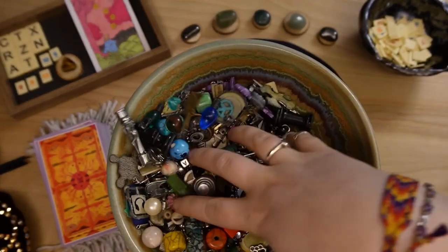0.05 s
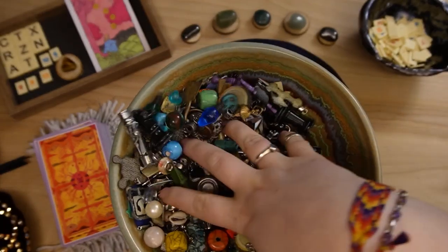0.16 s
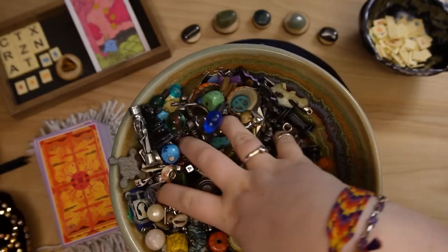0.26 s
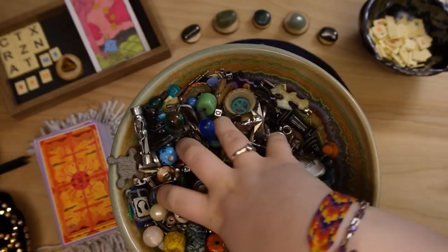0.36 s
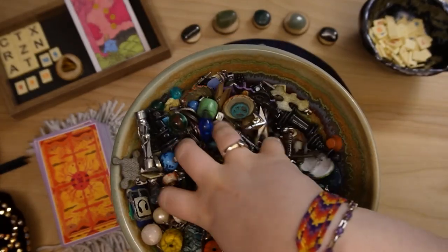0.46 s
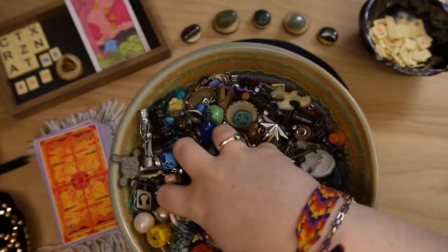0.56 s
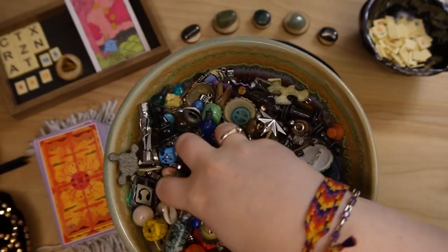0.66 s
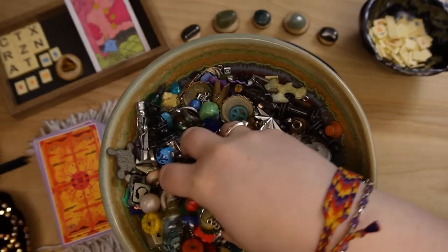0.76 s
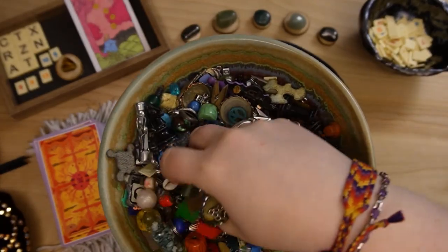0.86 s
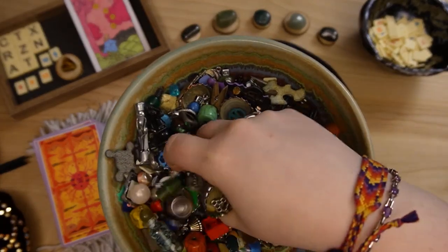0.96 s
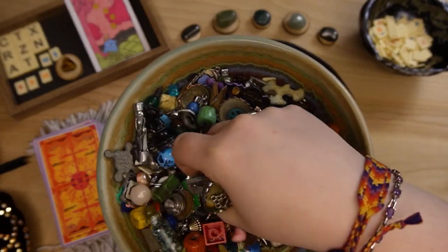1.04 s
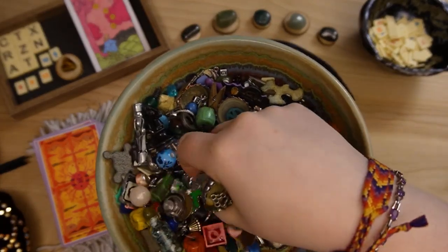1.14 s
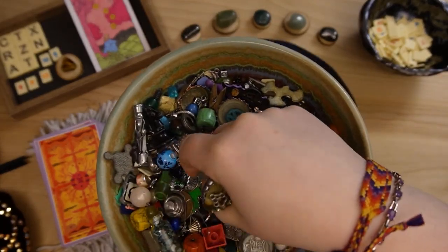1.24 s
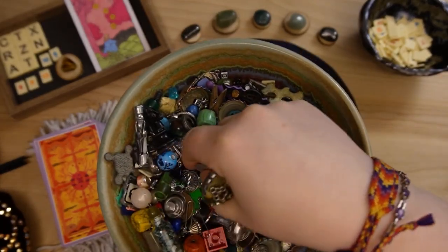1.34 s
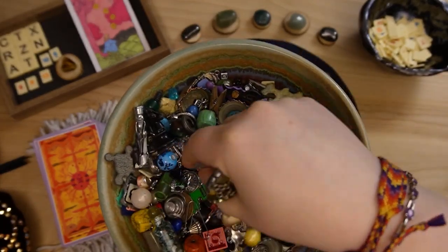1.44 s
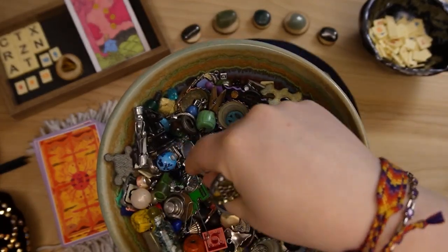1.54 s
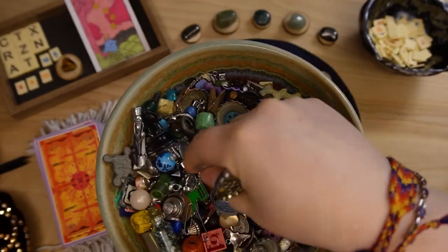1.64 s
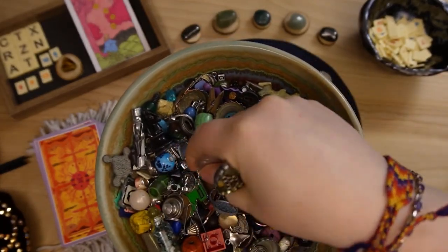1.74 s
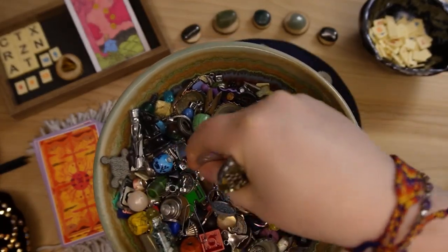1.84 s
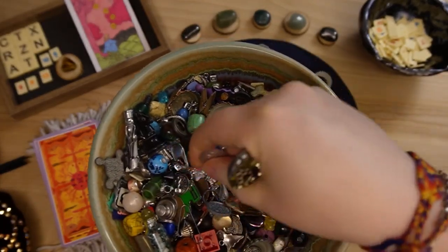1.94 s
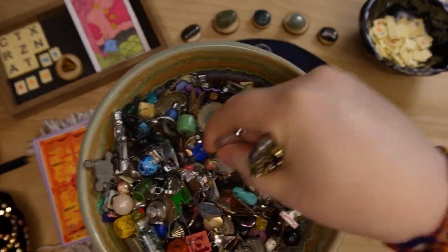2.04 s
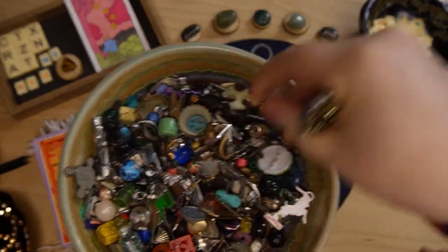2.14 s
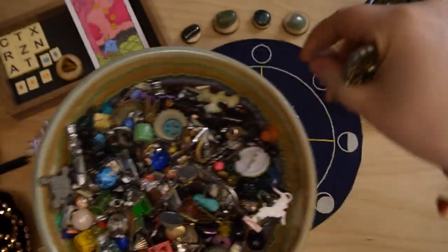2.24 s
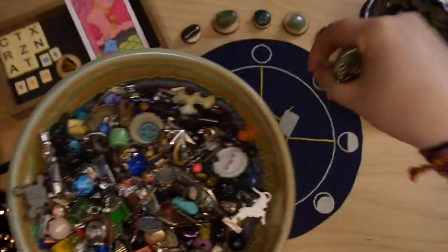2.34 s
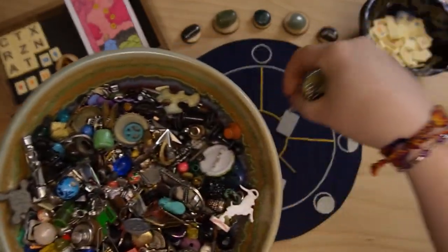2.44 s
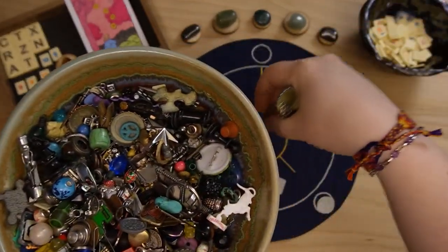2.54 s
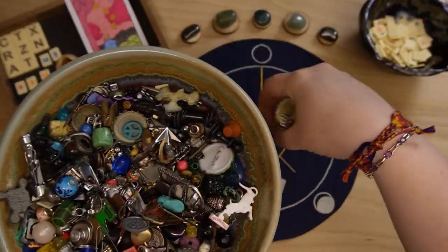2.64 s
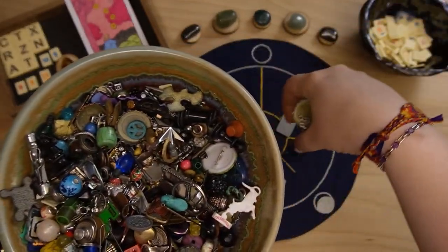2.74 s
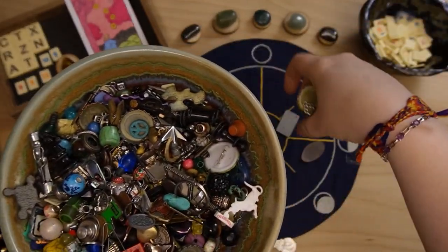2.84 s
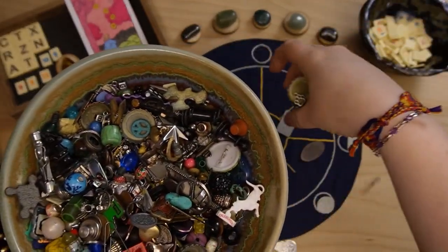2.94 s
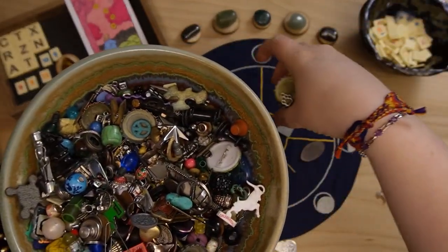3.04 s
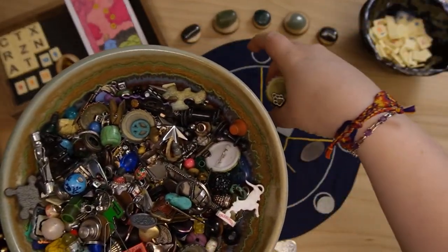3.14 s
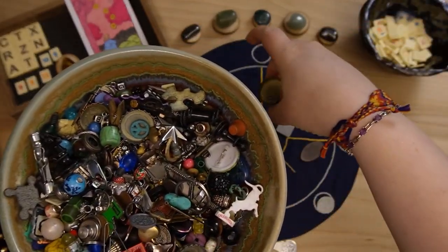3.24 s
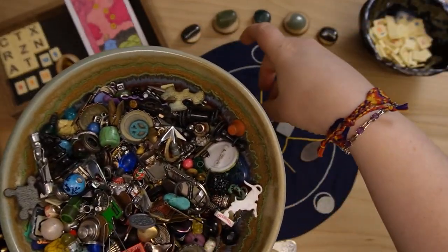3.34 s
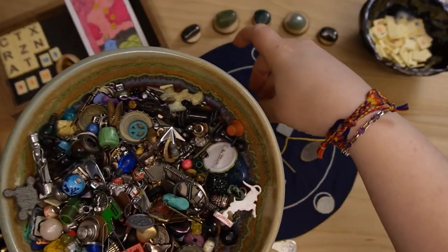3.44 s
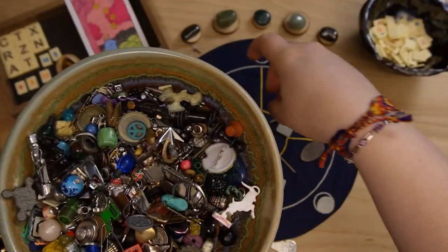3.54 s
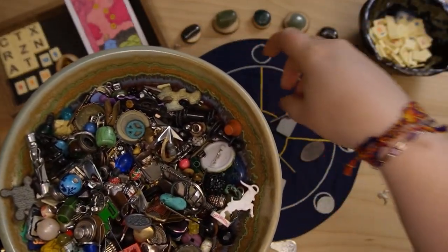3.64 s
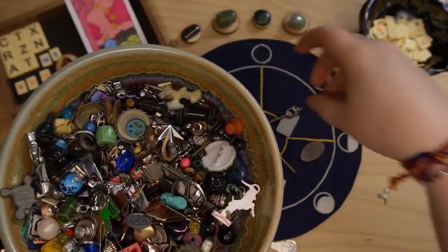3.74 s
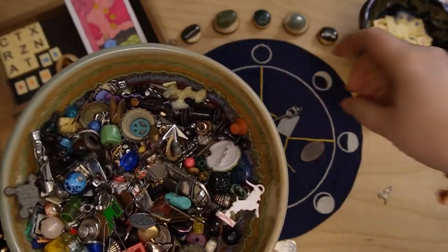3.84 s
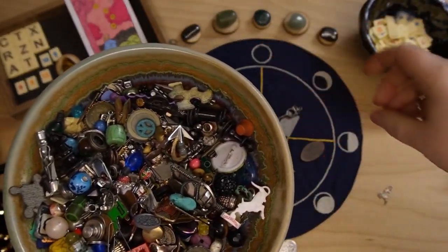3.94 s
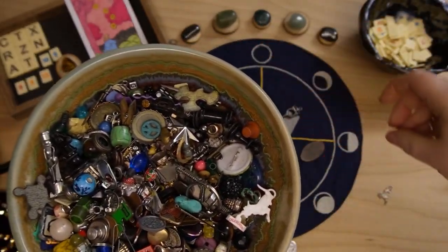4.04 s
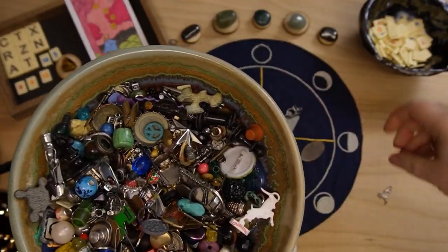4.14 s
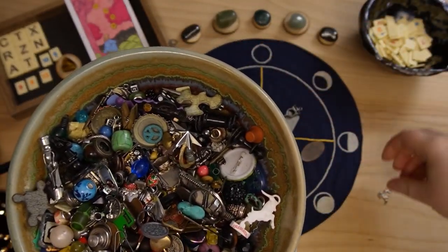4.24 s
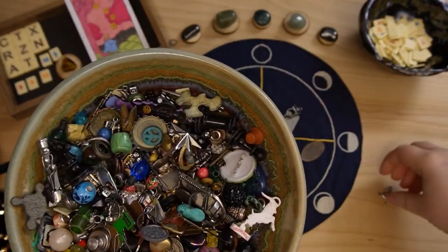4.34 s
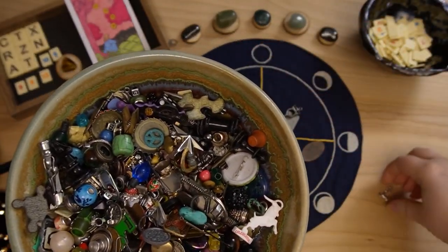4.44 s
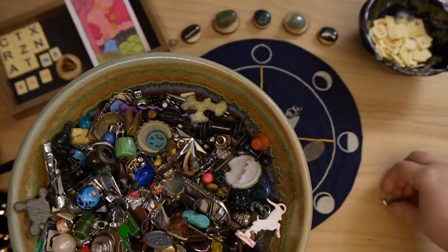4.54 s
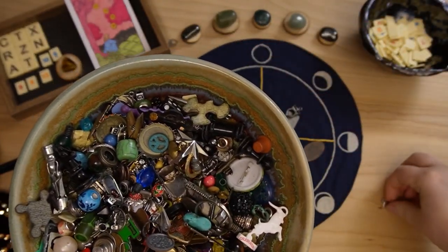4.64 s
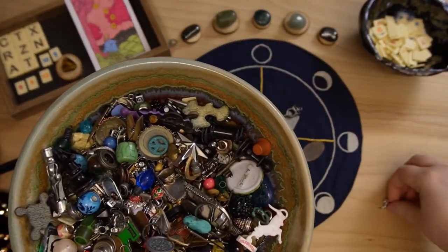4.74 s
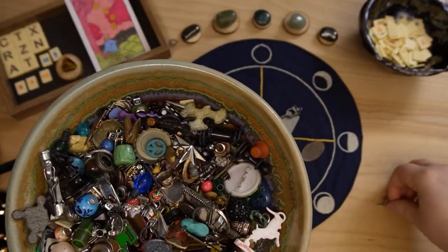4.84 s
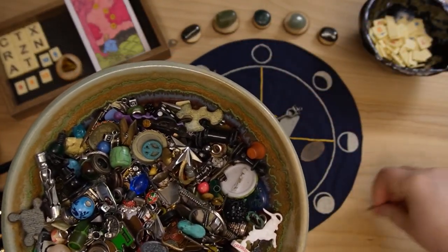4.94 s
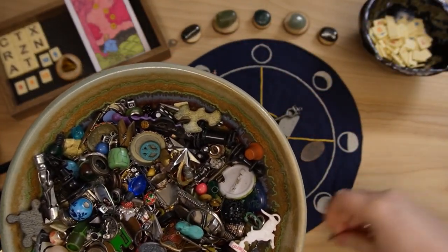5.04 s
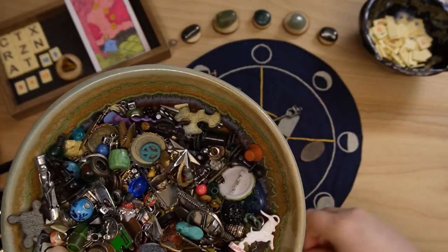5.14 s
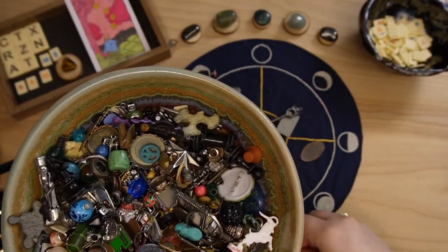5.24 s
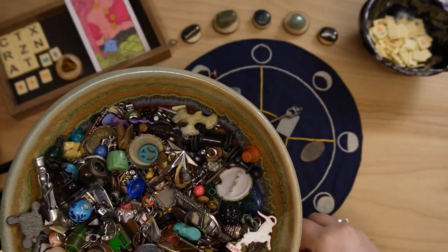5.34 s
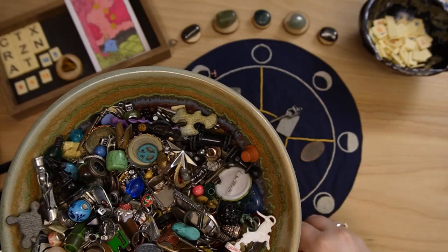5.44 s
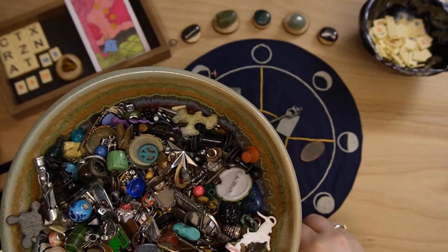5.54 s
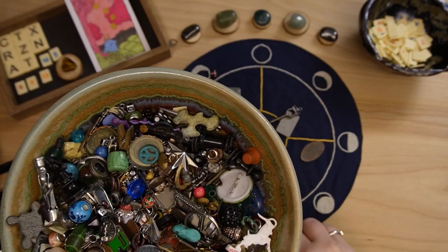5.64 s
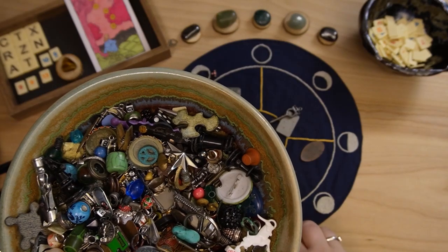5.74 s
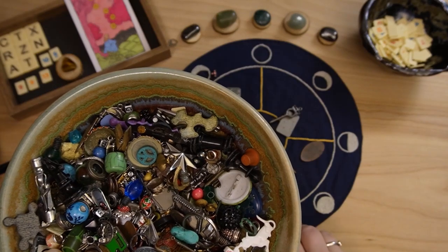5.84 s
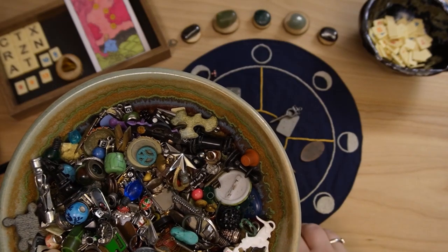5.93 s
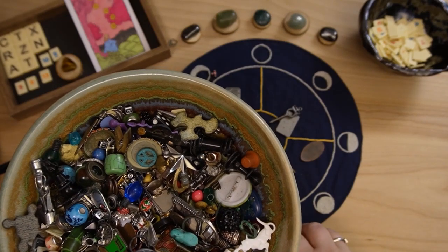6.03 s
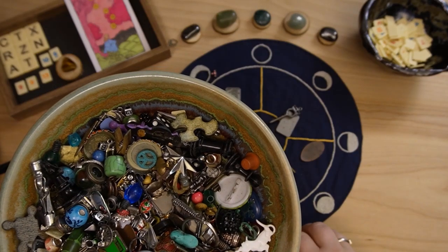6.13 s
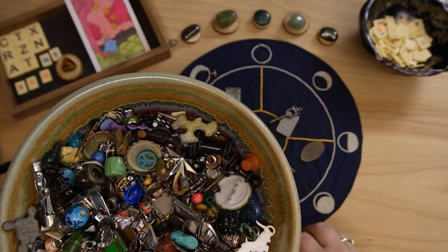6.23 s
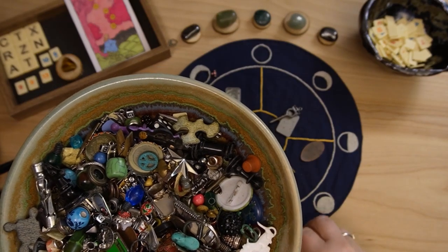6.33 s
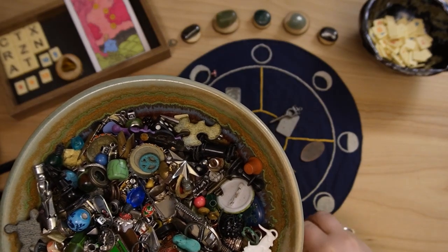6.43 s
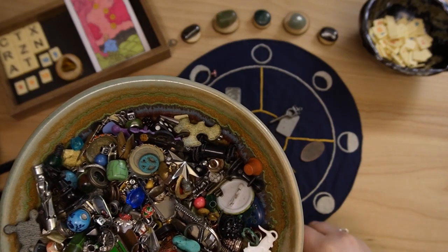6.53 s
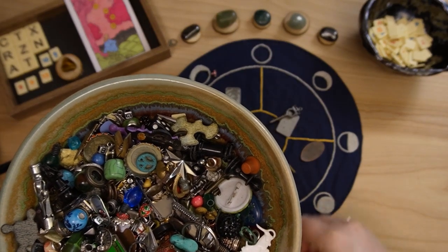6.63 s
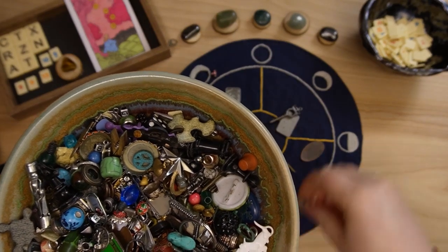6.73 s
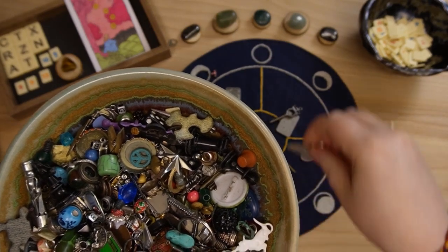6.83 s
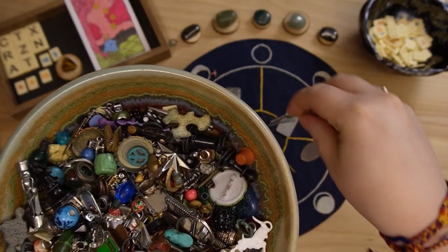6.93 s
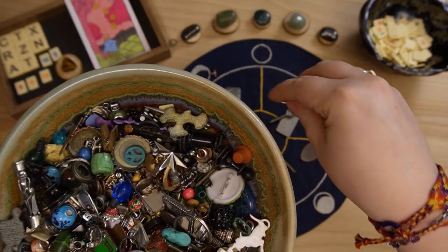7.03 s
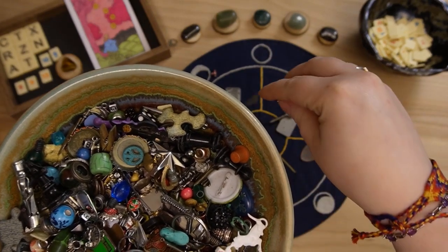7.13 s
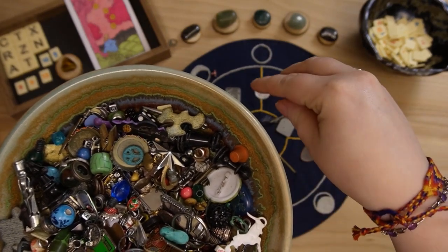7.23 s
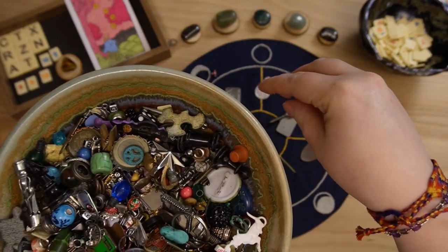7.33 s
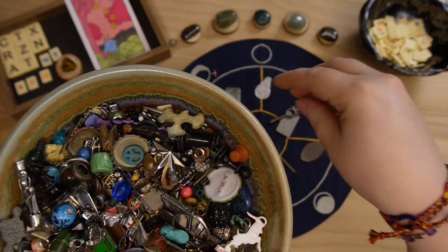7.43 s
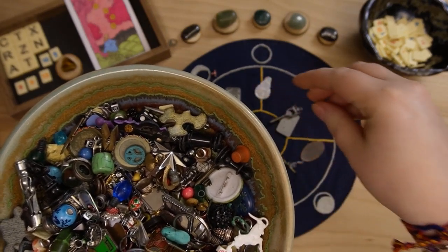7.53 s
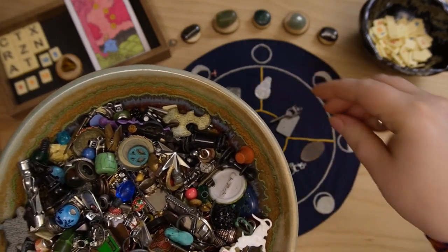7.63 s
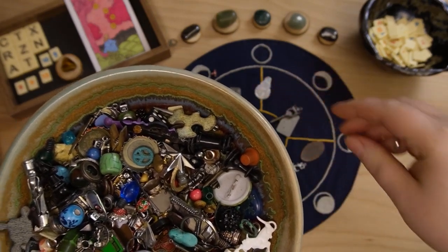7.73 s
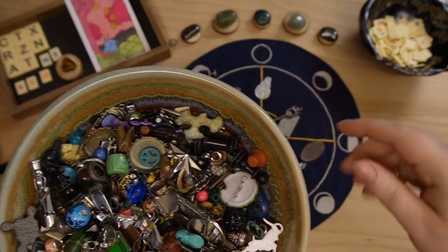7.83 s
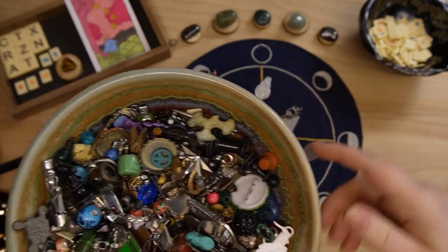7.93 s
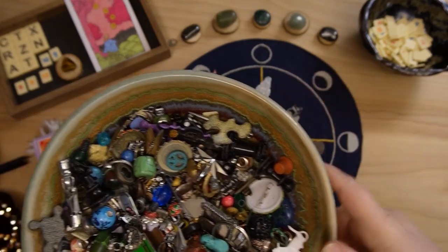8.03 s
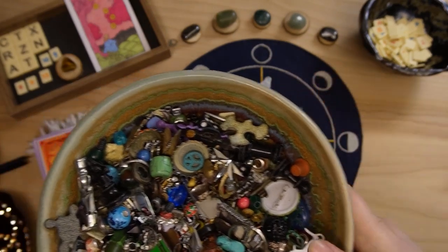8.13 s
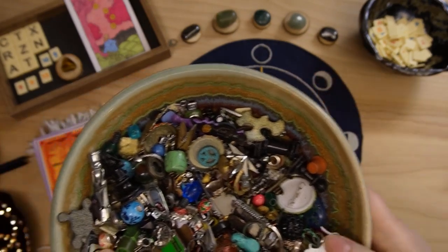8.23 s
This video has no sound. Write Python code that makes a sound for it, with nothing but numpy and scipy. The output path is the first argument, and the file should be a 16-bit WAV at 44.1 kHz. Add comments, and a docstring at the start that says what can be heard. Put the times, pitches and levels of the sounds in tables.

```python
"""A hand rummages in a ceramic bowl of small metal charms and beads: random tiny impacts on many modes.
It lifts a few out: they clink in the fingers as decaying sines and knock on a cloth on a wooden table.
The hand bumps the table, charms grind and rattle over the wood, and one hops on the bare wood to rest.
The hand drags a charm, bumps and rubs along the table with shaped noise and tiny slips of skin, and its
nails tick; then the last charms drop and a faint hiss comes up. All is close, in a small dry room."""
import sys
import numpy as np
from scipy import signal
from scipy.fft import rfft, irfft, next_fast_len
from scipy.io import wavfile
from scipy.ndimage import uniform_filter1d

SR = 44100
rng = np.random.default_rng(int(sys.argv[2]) if len(sys.argv) > 2 else 0)


def unload_audio(sound):
    """Save the sound as a 16-bit wav file, at the path given as the first command line argument."""
    columns = np.transpose(np.atleast_2d(sound))
    # keep every value between -1 and 1, then stretch to whole-number steps
    steps = np.round(np.clip(columns, -1, 1) * 32767)
    wavfile.write(sys.argv[1], SR, steps.astype(np.int16))


N = 365126
TIME = np.arange(N) / SR
AGE = TIME[:SR // 3]   # seconds since a blow


def from_db(db):
    """Turn decibels into gain."""
    return 10 ** (np.asarray(db) / 20)


def rms_one(x):
    """Scale a sound to rms 1."""
    return x / np.sqrt(np.mean(x ** 2) + 1e-20)


def attack_one(x):
    """Scale a blow so that its first 4 ms have the power of a sine of height 1."""
    return x / np.sqrt(2 * np.mean(x[:SR // 250] ** 2) + 1e-20)


def gain_curve(rows, axis=1):
    """Join the levels of a dB column into a gain over time, practically silent outside its rows."""
    rows = np.array(rows)
    return from_db(np.interp(TIME, rows[:, 0], rows[:, axis], left=-140, right=-140))


SWELL_SHAPE = 0.9   # power to which the half sine of a stroke is raised


def swells(rows, axis=2):
    """Gain over time of strokes that each swell and fade; rows begin with start and length in seconds."""
    gain = np.zeros(N)
    for row in rows:
        arch = np.sin(np.linspace(0, np.pi, max(round(row[1] * SR), 2)))
        add(gain, row[0], from_db(row[axis]) * np.abs(arch) ** SWELL_SHAPE)
    return gain


def gain_at(spectrum, hz):
    """Read the gain of a spectrum at the given frequencies."""
    points = np.array(spectrum)
    return from_db(np.interp(np.log(hz + 1), np.log(points[:, 0]), points[:, 1]))


def cut(x, hz, kind="low", order=2):
    """Keep only the lows or the highs with a Butterworth filter."""
    sos = signal.butter(order, min(hz, SR / 2 - 1000), kind, fs=SR, output="sos")
    return signal.sosfilt(sos, x + 1e-18)


def add(track, s, sound):
    """Mix a sound into the track at s seconds."""
    start = max(round(s * SR), 0)
    track[start:start + len(sound)] += sound[:N - start]


def noise(spectrum):
    """Steady noise of a given colour, rms 1: white noise shaped by the spectrum."""
    size = next_fast_len(N)
    shape = gain_at(spectrum, np.fft.rfftfreq(size, 1 / SR))
    coloured = irfft(rfft(rng.standard_normal(size)) * shape, size)
    return rms_one(coloured[:N])


def dying_sines(hz, t60):
    """One decaying sine of height 1 per mode; t60 is the time in seconds to fall by 60 dB."""
    age = AGE.astype(np.float32)
    loss = np.minimum(np.outer(np.float32(np.log(1000) / t60), age), 30)
    return np.exp(-loss) * np.sin(np.outer(np.float32(2 * np.pi * hz), age))


def ring(modes, vary_db, waver=1):
    """One blow on a few clear modes, each with a random strength and sign of its own."""
    hz, db, t60 = np.array(modes).T
    strength = from_db(db + vary_db * rng.standard_normal(db.shape)) * rng.choice([-1, 1], db.shape)
    return attack_one(strength @ (waver * dying_sines(hz, t60)))


def dense_body(spectrum, t60, slope, count):
    """Crowded modes whose energy follows the spectrum; t60 holds at 1 kHz and higher modes die sooner."""
    grid = np.linspace(np.sqrt(spectrum[0][0]), np.sqrt(spectrum[-1][0]), count) ** 2
    spacing = np.gradient(grid)
    hz = grid + spacing * rng.uniform(-.5, 0.64, count)
    life = t60 * (hz / 1000) ** -slope
    height = gain_at(spectrum, hz) * np.sqrt(spacing / life)
    return np.float32(height)[:, None] * dying_sines(hz, life)


def strikes(body, count):
    """Hit a body at several points: each pushes its modes with a different pattern of signs."""
    signs = rng.choice(np.float32([-1, 1]), (count, len(body)))
    return (signs @ body).astype(float)


def blows(rows, body, alike=0):
    """A row of blows on one body; alike is the share of power from a sound that they have in common."""
    track, alike = np.zeros(N), np.clip(alike, 0, 1)
    common, *own = strikes(body, count=len(rows) + 1)
    for (s, db), sound in zip(rows, own):
        mixed = np.sqrt(alike) * common + np.sqrt(1 - alike) * sound
        add(track, s, from_db(db) * attack_one(mixed))
    return track


EDGE_GAP_S, EDGE_LOSS_DB = 0.0018, 4   # typical time between two edges; loss from each edge to the next


def landing(body, count=3):
    """An uneven charm lands on one edge, then tips onto the next ones within a few milliseconds."""
    delays = np.arange(count) * EDGE_GAP_S * rng.uniform(.7, 1.3)
    total = np.zeros(len(AGE))
    for k, edge in enumerate(strikes(body, count)):
        late = np.pad(edge, (round(delays[k] * SR), 0))[:len(AGE)]
        total += from_db(-EDGE_LOSS_DB * k) * late
    return attack_one(total)


def collisions(per_s, spread_db, clump_db=3.0, clump_s=.012):
    """Random tiny impacts, many weak and few strong, bunched into little avalanches."""
    knots = np.arange(0, N / SR, max(clump_s, 1 / 500))
    wander = np.clip(rng.standard_normal(len(knots)), -2, 2)
    surge = from_db(clump_db * np.interp(TIME, knots, wander))
    sizes = from_db(spread_db * np.minimum(rng.exponential(1, N), 3.5)) * rng.choice([-1, 1], N)
    happens = rng.random(N) < surge * per_s / SR
    return sizes * np.sqrt(surge) * happens


def clatter(clicks, voices, turnover=30, count=4):
    """A few voices play at a time and new ones take over (turnover per s); the power is kept near 1."""
    track, times = np.zeros(N), np.flatnonzero(clicks) / SR
    chosen = (times * turnover).astype(int) + rng.integers(0, count, len(times))
    for s, size, k in zip(times, clicks[clicks != 0], chosen):
        add(track, s, size * voices[k % len(voices)])
    power = np.abs(uniform_filter1d(track ** 2, SR // 16))
    return track / np.sqrt(power + 1e-12)


def faint_partials(t60=0.082, count=16, top_hz=12500):
    """An irregular casting has many weak partials besides its main modes."""
    hz = rng.uniform(2200, top_hz, count)
    return np.column_stack([hz, np.zeros(count), t60 * rng.uniform(0.73, 1.2, count)])


def room(x, t60=0.086, wall_hz=6000, first_s=0.002):
    """Dense, quickly dying reflections of a furnished room, made from fading dulled noise."""
    fade = from_db(-60 * AGE / t60) * np.clip(AGE / first_s - 1, 0, 1)
    echoes = cut(rng.standard_normal(len(AGE)), wall_hz, order=1) * fade
    return signal.fftconvolve(x, echoes / np.sqrt(np.sum(echoes ** 2)))[:N]


# The colour of the quiet room. Each row: frequency in Hz, relative level in dB per Hz.
ROOM_COLOUR = [(15, -34), (25, -2.5), (53, -5), (123, -9.5), (317, -9.5), (416, -25), (887, -24.5),
               (1040, -32), (1610, -32.5), (3080, -40.5), (3720, -36), (4370, -45), (6050, -42.5),
               (16000, -54.5)]
# How loud the quiet room is. Each row: time in seconds, level in dB.
ROOM_LEVELS = [(0, -63.5), (2.2, -66.5), (4.3, -67), (5.1, -67.5), (6.9, -67.5), (7.7, -68.5), (8.0, -63),
               (8.28, -65)]


def room_tone():
    """The background of the room: steady coloured noise that follows a slow level curve."""
    return gain_curve(ROOM_LEVELS) * noise(ROOM_COLOUR)


# The modes of the bowl's wall. Each row: frequency in Hz, relative level in dB, t60 in seconds.
BOWL_MODES = [(1820, -3, 0.064), (3265, 1.5, 0.044), (4828, -3, 0.024), (6754, -7, 0.041),
              (8400, -15.5, 0.098), (8940, -5.5, 0.085)]


def charm_voices(body, count, mode_db=6.5, tint_db=1.0, wall_db=-11.5, ping_db=-8.5, ping_t60=0.065):
    """Each charm has its own colour, favourite modes and small high ping, and shakes the bowl a little."""
    shape = (count, len(body))
    tint = rms_one(uniform_filter1d(rng.standard_normal(shape), size=45, axis=1))
    favour = from_db(mode_db * rng.standard_normal(shape) + tint_db * tint) * rng.choice([-1, 1], shape)
    voices = []
    for voice in favour @ body:
        wall = from_db(wall_db) * ring(BOWL_MODES, vary_db=11.5)
        ping = from_db(ping_db) * ring(faint_partials(ping_t60, count=2, top_hz=10470), vary_db=1.5)
        voices.append((attack_one(voice) + wall + ping)[:SR // 10])
    return voices


# The colour of the heap of charms. Each row: frequency in Hz, relative level in dB per Hz.
HEAP_COLOUR = [(35, -40), (60, -6), (113, -5.5), (480, -8.5), (1010, 2.5), (1820, -1.5), (2090, -3),
               (2850, -6.5), (3270, -7.5), (3700, -10), (4860, -8.5), (7570, -18.5), (8850, -2.5),
               (10700, -14.5), (12100, -7), (13600, -13.5), (16000, -38.5)]
BEADS_PER_S, BEAD_DB, BEAD_T60_S = 70, -0.5, 0.0083   # typical rate; gain of a click; fall at 1 kHz


def beads():
    """Glass beads click dryly against each other, each click with one of many colours."""
    track, clicks = np.zeros(N), collisions(per_s=BEADS_PER_S, spread_db=2.0, clump_db=1.0)
    body = dense_body(HEAP_COLOUR, t60=BEAD_T60_S, slope=0.091, count=160)
    voices = charm_voices(body, count=30)
    for i in np.flatnonzero(clicks):
        add(track, i / SR, clicks[i] * voices[rng.integers(len(voices))])
    return from_db(BEAD_DB) * track


# Stirring the heap. Each row: time in seconds, clatter in dB, treble in dB, both before a fixed trim.
STIRRING = [(0.0, -55, -59), (0.09, -44, -47), (0.38, -40, -45), (0.466, -44, -48.5), (0.53, -39, -44),
            (0.82, -41.5, -42.5), (1.3, -46.5, -45.5), (1.42, -54.5, -54), (1.62, -60.5, -56)]
# The heap settles as the hand leaves it. Each row: start in seconds, length in seconds,
# clatter in dB, treble in dB, both before the same trim.
SETTLING = [(1.63, 0.2, -55.5, -74)]
LEAST_PER_S, MORE_PER_S = 130, 650   # typical collisions: at rest, and added at full vigour


def heap(treble_hz=6000, clatter_db=-2.5, treble_db=-4.5):
    """Dozens of charms and beads jostle, more often the harder they are stirred."""
    vigour = gain_curve(STIRRING) + swells(SETTLING)
    sparkle = gain_curve(STIRRING, axis=2) + swells(SETTLING, axis=3)
    voices = charm_voices(dense_body(HEAP_COLOUR, t60=0.059, slope=0.022, count=420), count=70)
    rate = LEAST_PER_S + MORE_PER_S * vigour / vigour.max()
    impacts = collisions(per_s=rate, spread_db=3.2, clump_db=0.5)
    jostle = clatter(impacts, voices, turnover=45, count=4) + beads()
    low = rms_one(cut(jostle, treble_hz, order=4))
    high = rms_one(cut(jostle, treble_hz, "high", order=4))
    return from_db(clatter_db) * vigour * low + from_db(treble_db) * sparkle * high


# Charms that hit the wall of the bowl. Each row: time in seconds, level in dB before a fixed trim.
WALL_HITS = [(0.079, -26.5), (1.376, -17.5), (1.649, -27.5), (1.664, -29.5), (1.697, -31.5), (1.728, -31.5),
             (1.77, -36), (1.796, -41.5)]


def bowl():
    """A charm strikes the glazed wall: a crack and a short ring, damped by the heap."""
    track = from_db(-8.0) * blows(WALL_HITS, dense_body(HEAP_COLOUR, t60=0.027, slope=0.24, count=200))
    for s, db in WALL_HITS:
        add(track, s, from_db(db - 7.0) * ring(BOWL_MODES, vary_db=2.0))
    return track


def thump(modes, vary_db):
    """A push from above starts all low modes in the same direction; peak 1."""
    hz, db, t60 = np.array(modes).T[:, :, None]
    strength = from_db(db + vary_db * rng.standard_normal(db.shape))
    wave = np.sum(strength * from_db(-60 * AGE / t60) * np.sin(2 * np.pi * hz * AGE), axis=0)
    return wave / np.abs(wave).max()


# The modes of the table top. Each row: frequency in Hz, relative level in dB, t60 in seconds.
TABLE_MODES = [(82, -10, 0.067), (158, 3, 0.05), (243, -3.5, .1), (326, -1.5, .08), (378, 1.5, 0.07),
               (680, -2, .05), (1010, 2, .05), (1450, 2.5, .04), (1720, 2.5, .045), (1956, 0.5, .04),
               (3250, 3, .035)]


def thud(soft_hz=480):
    """A soft, heavy push moves mainly the low modes of the table top; peak 1."""
    wave = cut(thump(TABLE_MODES, vary_db=2.0), soft_hz, order=3)
    return wave / np.abs(wave).max()


# The loudest slips of one charm against another in the heap; the one at 0.19 s is a charm striking # the bowl's
# wall. Each row: time in seconds, level of the slip in dB before its parts are trimmed, # pitch of its ring in
# Hz.
SLIPS = [(0.11, -26, 1570), (0.19, -28.5, 8936), (0.206, -27, 1770), (0.314, -25.5, 1055),
         (0.338, -27.5, 3200), (0.4, -26.5, 9100), (0.434, -31.5, 1800), (0.457, -36, 8893),
         (0.519, -27, 3000), (0.619, -38, 1560), (0.637, -23, 8570), (0.675, -25.5, 8670),
         (0.685, -41, 8700), (0.697, -40, 8591), (0.712, -43, 8634), (0.748, -31, 4470),
         (0.833, -25.5, 5040), (0.885, -26, 8634), (0.957, -24.5, 8893), (1.064, -39, 3300),
         (1.103, -22.5, 1100), (1.156, -28, 1890), (1.165, -22.5, 1005), (1.199, -29.5, 6115),
         (1.22, -25, 4900), (1.244, -32, 9900), (1.255, -21, 8828), (1.309, -24.5, 8700),
         (1.457, -29.5, 12058)]
# The deeper the fingers dig, the more a slip thuds through to the table.
# Each row: time in seconds, thud in dB relative to the level of the slip.
DIG_DEPTH = [(0.85, -29), (0.95, -15.5), (1.45, -20)]
# Gain of the crack, of the bowl's ring and of the charm's ring; t60 of the charm's ring
SNAP_CRACK_DB, SNAP_WALL_DB, SNAP_RING_DB, SNAP_T60_S = -14, -21, -14, 0.027


def snaps():
    """A wedged charm slips free: a crack, brighter for small charms, its short ring, the bowl and table."""
    track = np.zeros(N)
    body = dense_body(HEAP_COLOUR, t60=0.021, slope=.2, count=200)
    for s, db, hz in SLIPS:
        crack = from_db(SNAP_CRACK_DB) * attack_one(cut(landing(body), 3 * hz))
        wall = from_db(SNAP_WALL_DB) * cut(ring(BOWL_MODES, vary_db=5.0), 3 * hz)
        own = from_db(SNAP_RING_DB) * ring([(hz, 0, SNAP_T60_S)], vary_db=0)
        below = from_db(np.interp(s, *np.transpose(DIG_DEPTH))) * thud()
        add(track, s, from_db(db) * (crack + wall + own + below))
    return track


SPIN_HZ, SPIN_DEPTH = 22, .55   # a charm turns at half to twice this rate; depth of the waver, 0 to 1


def tumbling(modes, vary_db):
    """The ring of a free charm: as it turns, each mode swells and fades in its own way."""
    turns = [np.sin(2 * np.pi * (SPIN_HZ * rng.uniform(.5, 2) * AGE + rng.random())) for _ in modes]
    return ring(modes, vary_db, waver=1 + np.clip(SPIN_DEPTH, 0, 1) * np.array(turns))


def metal_tick(metal, partials, partials_db=-8.0):
    """The bright instant of contact, with a short shimmer of weak partials."""
    contact = attack_one(strikes(metal, count=1)[0])
    return contact + from_db(partials_db) * ring(partials, vary_db=5.5)


# Charms clink in the fingers. Each row: time in seconds, ring in dB, contact in dB (both before a
# fixed trim), length of the chatter in seconds, which charm rings.
FINGER_CLINKS = [(0.731, -18.5, -34, 0.005, "clasp"), (2.514, -58, -46, 0.005, "plate"),
                 (2.519, -40.5, -38.5, 0.055, "plate"), (2.627, -58, -43.5, 0.005, "bead"),
                 (2.864, -38.5, -35, 0.005, "clasp"), (3.017, -58, -40, 0.005, "pendant"),
                 (3.197, -26.5, -39, 0.005, "pin"), (3.265, -46.5, -51, 0.005, "pin"),
                 (3.356, -37, -37, 0.005, "hoop"), (3.448, -19.5, -28, 0.005, "pin"),
                 (3.566, -20.5, -23, 0.055, "pendant")]
# The modes of each named charm. Each row: frequency in Hz, relative level in dB, t60 in seconds.
CHARM_MODES = {"plate": [(970, -9.5, 0.97), (2580, -6.5, .22), (5550, -13.5, .22), (6075, -13.5, 0.24),
               (7045, -6.5, 0.22), (7860, -7, 0.16), (8716, -4, 0.18), (9700, 1.5, 0.12), (10610, -4, .13),
               (11820, -6.5, .2), (12690, -10, .2), (13270, -8, .2)], "coin": [(1728, -3, 0.27),
               (3335, -2, .38), (4620, -10, .16), (5480, -12, .15), (5825, -10, 0.18), (11440, -10, 0.11)],
               "clasp": [(4520, -0.5, 0.027), (4750, -3, 0.021), (8800, -5.5, 0.14)],
               "bead": [(7090, -4, 0.2), (13730, -1, .17)], "leaf": [(3160, -7, 0.15), (4450, -14, .2),
               (8040, -7.5, 0.18), (10500, -10, 0.21)], "pin": [(9300, -7.5, 0.05), (9626, -5, 0.11),
               (9550, -9, 0.05), (11300, -13.5, .04), (8400, -13, .03)], "hoop": [(1884, 2, 0.22),
               (4400, -2.5, .24), (7190, -4.5, .16), (10210, -4.5, .18), (12945, -6.5, .19)],
               "tag": [(2525, 2.5, 0.055), (3335, -8, .22), (4600, -2, .18), (5880, -2.5, .12),
               (8380, -6, 0.11), (12700, -17, 0.076)], "pendant": [(1880, -18, 0.2), (3741, -5, 0.057),
               (5130, 3, 0.049), (6030, -5, 0.11), (7050, -13, 0.2), (8425, -4.5, .08), (9790, -2, .09),
               (10600, -3.5, 0.11), (13370, -7.5, 0.11)], "key": [(2216, 8.5, 0.0287), (2660, 2.5, 0.024),
               (2990, 15, 0.023), (3366, 0, 0.03), (6090, -0.5, .028), (8260, -11, .035), (6370, -40, 0.53),
               (7068, -40, .42), (9220, -42, 0.33)]}
CHATTER_GAP_S, CHATTER_FADE_DB = 0.015, 20   # typical time between touches; loss over the whole chatter


def clinks(metal):
    """Loose charms touch and chatter: each touch is a bright tick, then the free ring of the metal."""
    track = np.zeros(N)
    for s, ring_db, tick_db, length_s, name in FINGER_CLINKS:
        partials = faint_partials()
        gaps = CHATTER_GAP_S * rng.uniform(.7, 1.3, 6)
        delays = np.cumsum(gaps) - gaps   # the first touch comes at once
        for delay in delays[delays < length_s]:
            tone = from_db(ring_db - 10.0) * tumbling(CHARM_MODES[name], vary_db=3.0)
            tick = from_db(tick_db - 13.5) * metal_tick(metal, partials)
            add(track, s + delay, from_db(-CHATTER_FADE_DB * delay / length_s) * (tone + tick))
    return track


# Charms knock on the table; the first two rows, at 1.59 and 1.634 s, are the fingers pushing the heap # against
# the bowl's bottom. Each row: time in seconds, level in dB before its parts are trimmed, # contact cut-off in
# Hz, thud in dB relative to that level, which charm rings on (None for no ring).
TABLE_KNOCKS = [(1.59, -32.5, 3500, -15, None), (1.634, -25.5, 3000, -32, None),
                (2.645, -25.5, 3900, -24, "coin"), (2.777, -19, 1500, -20, None),
                (2.7789, -12, 3200, -20, None), (2.790, -14.5, 4000, -16.5, "leaf"),
                (2.826, -16, 3600, -14.5, "leaf"), (2.895, -28.5, 1900, -2, None),
                (2.944, -25, 6500, -14, None), (2.953, -22.5, 9500, -29, "bead"),
                (2.99, -34.5, 5000, -16.5, None), (3.025, -22, 10000, -27, None),
                (3.072, -28, 9000, -20, None), (3.105, -16.5, 4000, -3, "pin"),
                (3.145, -24, 1700, -9, "pin"), (3.462, -12, 3400, -11, "hoop"),
                (7.117, -29.5, 3500, -15.5, "tag"), (7.363, -18, 4140, -8.5, "key"),
                (7.499, -29, 2800, -7.5, None), (7.61, -50, 900, 6, None)]
# How loudly each named charm rings on, in dB relative to the level of its knock.
RING_ON = {"coin": -26.5, "leaf": -30.5, "bead": -36.5, "pin": -9, "tag": -22, "key": -2.5, "hoop": -36}
# The colour of the covered wood. Each row: frequency in Hz, relative level in dB per Hz.
WOOD_COLOUR = [(60, -11), (150, -3), (240, -5.5), (380, 2.5), (570, -7.5), (700, -3), (1700, -3),
               (2550, -7), (3200, -4), (4400, -9.5), (7300, -12.5), (15000, -27)]
# The harder the contact, the brighter the knock and the louder the tick of metal.
TICK_DB, TICK_REF_HZ, TICK_DB_PER_OCTAVE = -12, 11000, 22   # tick level at the reference cut-off; slope


def table(metal, top_db=-4.5, knock_db=-6.5):
    """Charms land on the cloth: soft ones dull, heavy ones thud, free ones ring until a harder knock."""
    track = np.zeros(N)
    wood = dense_body(WOOD_COLOUR, t60=0.042, slope=.45, count=360)
    upper_modes = [mode for mode in TABLE_MODES if mode[0] > 500]
    for s, db, contact_hz, thud_db, name in TABLE_KNOCKS:
        top = from_db(top_db) * ring(upper_modes, vary_db=2.5)
        knock = from_db(knock_db) * attack_one(cut(landing(wood) + top, contact_hz, order=3))
        tick_db = TICK_DB + TICK_DB_PER_OCTAVE * np.log2(contact_hz / TICK_REF_HZ)
        tick = from_db(tick_db) * metal_tick(metal, faint_partials())
        add(track, s, from_db(db) * (knock + from_db(thud_db) * thud() + tick))
        if name:
            harder = [row[0] - s for row in TABLE_KNOCKS if row[0] > s and row[1] > db]
            free_s = min(harder, default=1)
            pinned = np.clip((free_s - AGE) * 50, 0, 1)   # fades out over the last 20 ms of freedom
            add(track, s, from_db(db + RING_ON[name]) * pinned * tumbling(CHARM_MODES[name], vary_db=1.5))
    return track


# The hand bumps the table. Each row: time in seconds, peak of the sway in dB, peak of the thud in dB.
HAND_BUMPS = [(2.88, -58, -34), (3.196, -49, -35.5), (3.449, -51, -30.5), (3.567, -47, -32),
              (4.544, -42.5, -42), (4.610, -35.5, -37.5), (5.273, -44, -46), (5.385, -51, -44.5),
              (5.656, -35.5, -53), (5.678, -42, -41.5), (5.708, -43, -53), (5.719, -42, -30.5),
              (6.123, -27.5, -36.5)]
# The slow sway of the whole table under a hand.
# Each row: frequency in Hz, relative level in dB, t60 in seconds.
SWAY_MODES = [(67.3, -11, 0.11), (86, -2, 0.17), (157, -8.5, 0.15)]


def bumps():
    """Soft bumps of the hand make the whole table sway and its top thud."""
    track = np.zeros(N)
    for s, db, thud_db in HAND_BUMPS:
        sway = from_db(db) * thump(SWAY_MODES, vary_db=2.0)
        add(track, s, sway + from_db(thud_db) * thud())
    return track


# Charms grind against each other in the fist. Each row: start in seconds, length in seconds, level in dB.
FIST_GRINDS = [(2.93, 0.2, -63.5), (3.1, 0.14, -59), (3.565, 0.051, -43)]


def grinding(metal):
    """Held charms only grind: a dense stream of tiny dulled metal contacts."""
    grains = cut(strikes(metal, count=12)[:, :SR // 25], 6000)
    return swells(FIST_GRINDS) * clatter(collisions(per_s=1500, spread_db=9.5), grains)


# The charm rattles along between its catches. Each row: start in seconds, length in seconds, level in dB.
RATTLES = [(3.12, 0.11, -52), (4.54, 0.14, -53), (4.818, 0.052, -63.5)]
# It catches on the grain of the wood. Each row: time in seconds, level in dB before a fixed trim.
GRAIN_CATCHES = [(4.531, -50), (4.561, -38), (4.586, -31.5), (4.595, -37), (4.608, -37.5), (4.626, -38),
                 (4.639, -34), (4.655, -32.5), (4.662, -32.5), (4.822, -48.5), (4.847, -52.5)]
# The colour of the dragged charm. Each row: frequency in Hz, relative level in dB per Hz.
DRAG_COLOUR = [(300, -15), (600, 1.5), (1050, 7.5), (1500, -1), (2100, -0.5), (3500, -8), (4700, -10),
               (5500, -18.5), (7200, -21.5), (8500, -34), (15000, -49)]


def dragging(catch_db=-9.0):
    """A pinched charm rattles over the wood in tiny impacts and catches now and then."""
    body = dense_body(DRAG_COLOUR, t60=0.034, slope=0.32, count=240)
    grains = strikes(body, count=10)[:, :SR // 25]
    track = swells(RATTLES) * clatter(collisions(per_s=700, spread_db=4.0, clump_db=1.5), grains)
    for s, db in GRAIN_CATCHES:
        add(track, s, from_db(db + catch_db) * landing(body))
    return track


# A small charm hops on bare wood, then rocks unevenly to rest.
# Each row: time in seconds, level in dB before a fixed trim.
HOPS = [(3.6505, -16), (3.695, -17), (3.732, -24), (3.7362, -21), (3.7498, -23.5), (3.7666, -32),
        (3.7803, -29), (3.790, -26.5), (3.7998, -30.5), (3.8102, -27), (3.8194, -28.5), (3.8263, -30.5),
        (3.8316, -33), (3.8474, -31)]
# The colour of the bare wood. Each row: frequency in Hz, relative level in dB per Hz.
BARE_COLOUR = [(100, -11), (400, -6.5), (580, -21.5), (1020, 7.5), (1330, -11.5), (1700, 3.5), (2000, -8.5),
               (2350, 4.5), (2600, -7), (3100, 2), (3800, 7), (4800, -22.5), (5700, 2.5), (7300, -17),
               (9000, -10.5), (15500, -35)]


def bouncing(click_db=-8.0, room_db=-20.5):
    """One light charm hits one patch of wood, so clicks are alike; the bare top throws them into the room."""
    wood = dense_body(BARE_COLOUR, t60=.017, slope=.45, count=400)
    clicks = from_db(click_db) * blows(HOPS, wood, alike=.4)
    return clicks + from_db(room_db) * room(clicks)


# The hand rubs over the table. Each row: start in seconds, length in seconds,
# rumble in dB, friction in dB, both before a fixed trim.
HAND_RUBS = [(5.26, 0.29, -58.5, -67), (5.54, 0.3, -51.5, -65), (5.66, 0.11, -69, -102),
             (5.83, 0.065, -58, -62), (5.90, 0.53, -56, -70.5), (6.11, 0.029, -37, -70),
             (6.225, 0.079, -47, -55), (6.492, 0.081, -44, -55.5), (6.57, 0.07, -59.5, -63.5)]
# The colour of the rumble of the palm. Each row: frequency in Hz, relative level in dB per Hz.
PALM_COLOUR = [(18, -36.5), (30, -11), (65, -3), (90, 2.5), (247, -5), (372, -15), (500, -31), (700, -22),
               (1200, -32.5), (2000, -71)]
# The colour of skin slipping on wood. Each row: frequency in Hz, relative level in dB per Hz.
SKIN_COLOUR = [(400, 2.5), (700, 3.5), (1500, -2.5), (2800, -9), (5000, -21.5), (9000, -18.5), (15000, -38)]


def rubbing():
    """The palm rumbles as low noise, and skin sticks and slips on the wood in fine tiny impacts."""
    slips = strikes(dense_body(SKIN_COLOUR, t60=0.027, slope=0.17, count=160), count=16)[:, :SR // 30]
    friction = clatter(collisions(per_s=800, spread_db=5.0, clump_db=2.0), slips)
    rumble = from_db(-0.5) * swells(HAND_RUBS) * noise(PALM_COLOUR)
    return rumble + from_db(-3.0) * swells(HAND_RUBS, axis=3) * friction


# Fingernails and finger rings tick on the wood. Each row: time in seconds, level in dB before a
# fixed trim, low edge in Hz, high edge in Hz.
NAIL_TICKS = [(5.271, -41.5, 300, 4030), (5.289, -41.5, 596, 15100), (5.339, -39.5, 1350, 3900),
              (5.458, -43.5, 1510, 15000), (5.674, -57, 300, 5000), (5.709, -40, 298, 2190),
              (5.724, -33.5, 506, 5700), (5.731, -39, 600, 5000), (5.759, -50, 397, 6000),
              (5.830, -37, 1400, 4430), (5.849, -40, 1400, 4500), (5.861, -45, 1410, 4500),
              (6.122, -37, 300, 5880), (6.496, -48, 400, 3450), (6.624, -49, 2980, 11000),
              (7.693, -46.5, 400, 16000)]
# The colour of a nail on wood. Each row: frequency in Hz, relative level in dB per Hz.
NAIL_COLOUR = [(250, -8), (600, 10.5), (1050, 3), (2000, 4.5), (3500, -3), (6000, -8), (12000, -2),
               (15500, -17)]


def nail_ticks():
    """Nails and finger rings strike the crowded modes of the wood, each tick in its own band."""
    track = np.zeros(N)
    nail = dense_body(NAIL_COLOUR, t60=0.037, slope=0.2, count=240)
    for (s, db, low_hz, high_hz), tick in zip(NAIL_TICKS, strikes(nail, count=len(NAIL_TICKS))):
        band = cut(cut(tick, high_hz), low_hz, "high")
        add(track, s, from_db(db - 10.0) * attack_one(band))
    return track


# The colour of the faint hiss. Each row: frequency in Hz, relative level in dB per Hz.
HISS_COLOUR = [(240, -42.5), (666, -3), (1090, -16), (3870, -17.5), (16000, -34.5)]
# How loud the hiss is at the end. Each row: time in seconds, level in dB.
HISS_LEVELS = [(7.9, -100), (7.95, -68.5), (8.28, -69)]


def hiss():
    """A faint hiss comes up at the end: coloured noise under a level curve."""
    return gain_curve(HISS_LEVELS) * noise(HISS_COLOUR)


# The colour of metal touching something. Each row: frequency in Hz, relative level in dB per Hz.
CONTACT_COLOUR = [(600, -15.5), (2000, -6.5), (4500, -7.5), (10000, -1.5), (13000, -8), (16000, -24)]


def scene():
    """All sources with their reflections, over the room tone and the hiss."""
    metal = dense_body(CONTACT_COLOUR, t60=.05, slope=.1, count=400)
    direct = heap() + bowl() + snaps() + clinks(metal) + table(metal) + bumps() + grinding(metal)
    direct = direct + dragging() + bouncing() + rubbing() + nail_ticks()
    return (direct + from_db(-18.0) * room(direct) + room_tone() + hiss())[None]


CUTOFF_HZ = 16100


def record(dry):
    """The microphone loses the deepest bass; the top is cut steeply."""
    thinned = cut(dry, 38, "high", order=4)
    steep = signal.ellip(10, .1, 80, CUTOFF_HZ, fs=SR, output="sos")   # 0.1 dB ripple, 80 dB down
    return signal.sosfilt(steep, thinned)


dry = scene()
out = record(dry)
unload_audio(out)
```